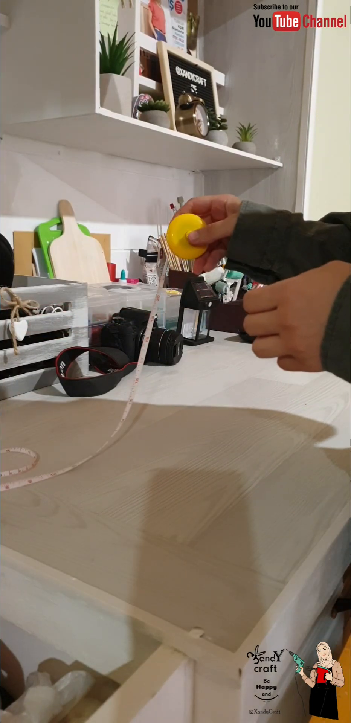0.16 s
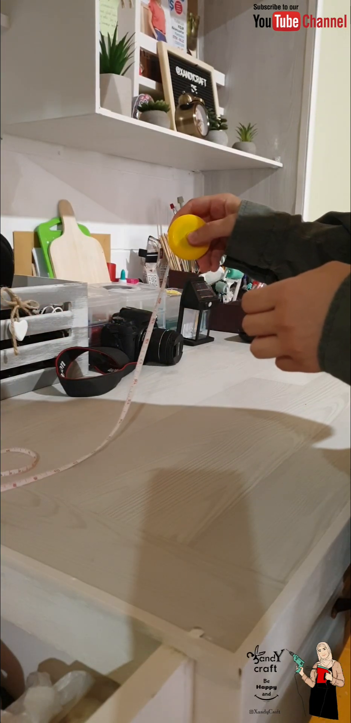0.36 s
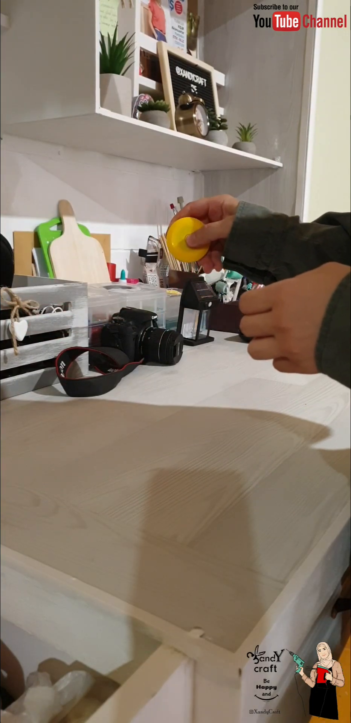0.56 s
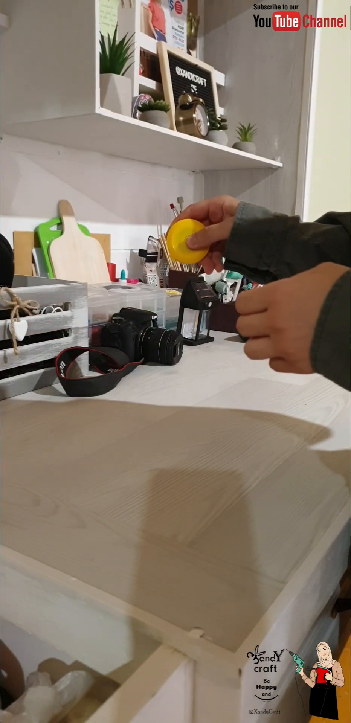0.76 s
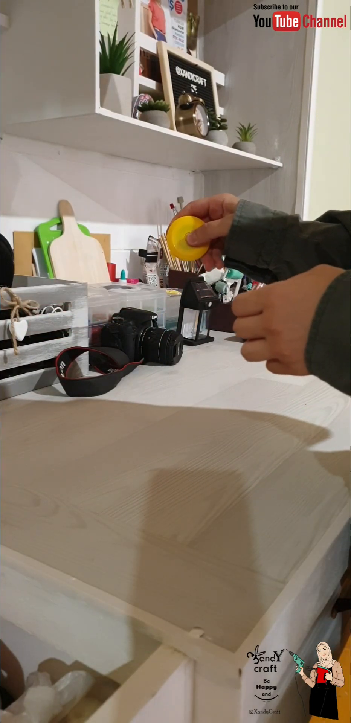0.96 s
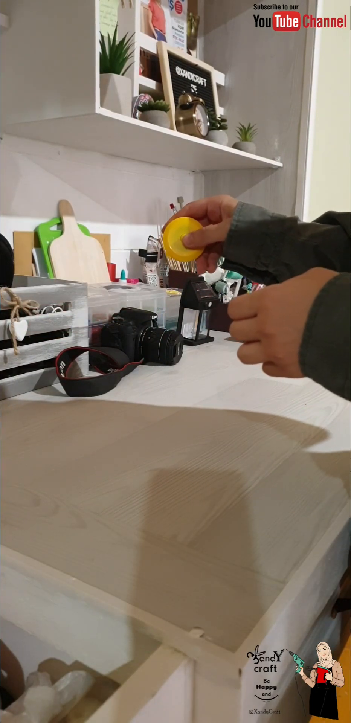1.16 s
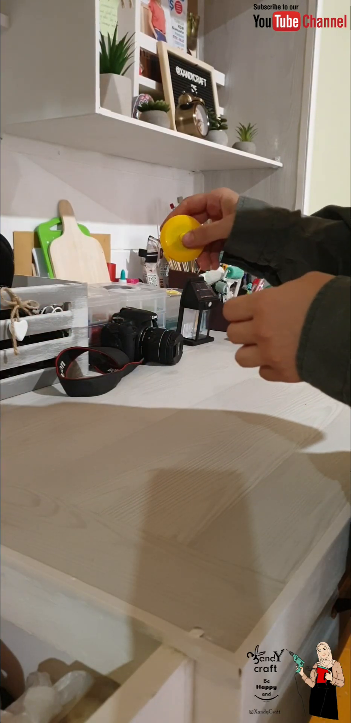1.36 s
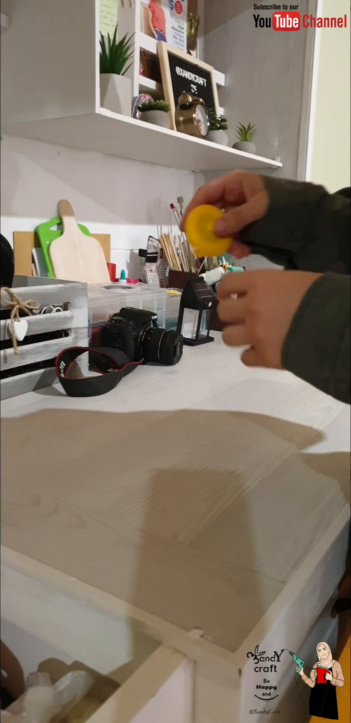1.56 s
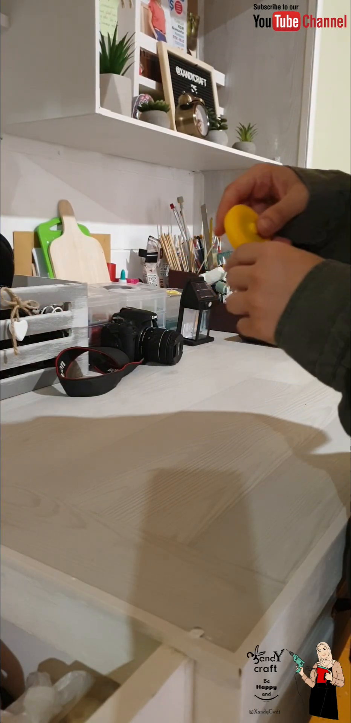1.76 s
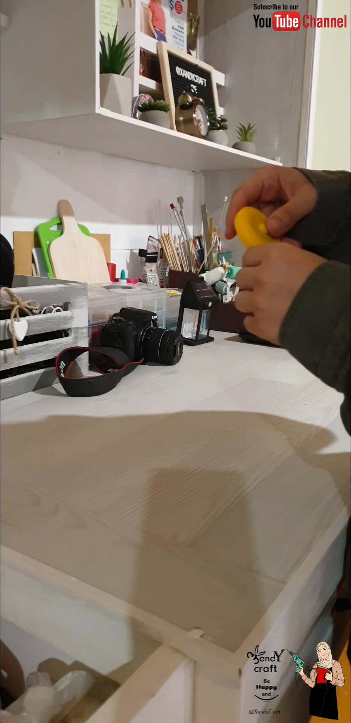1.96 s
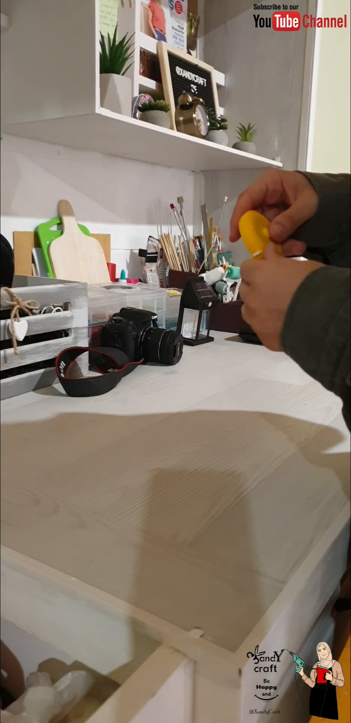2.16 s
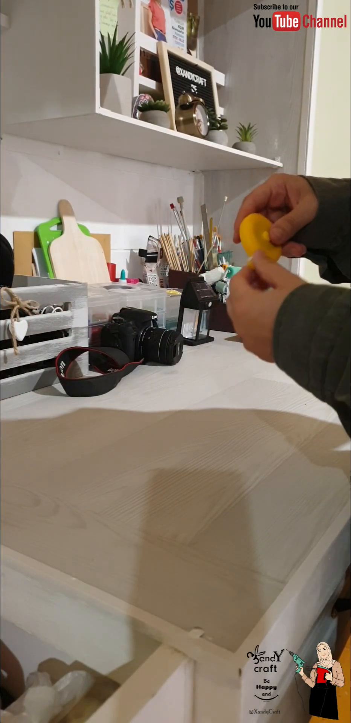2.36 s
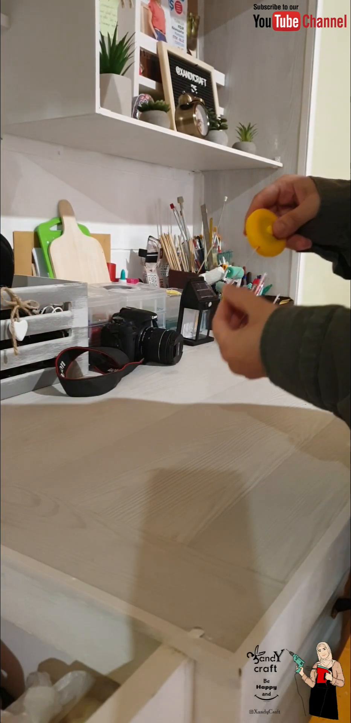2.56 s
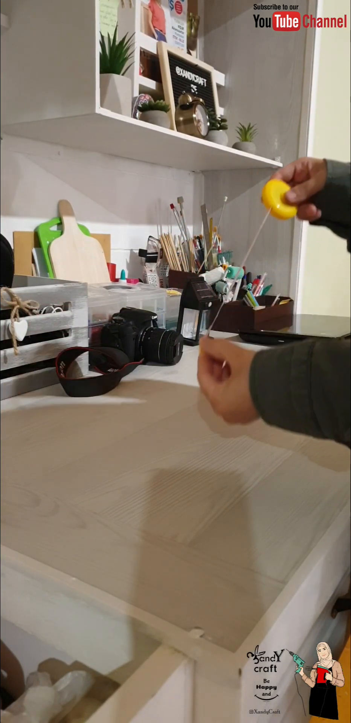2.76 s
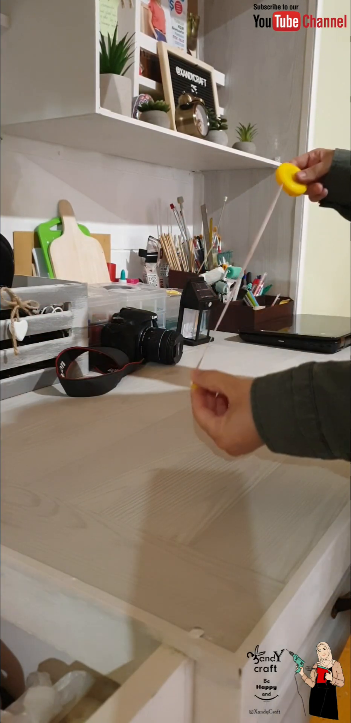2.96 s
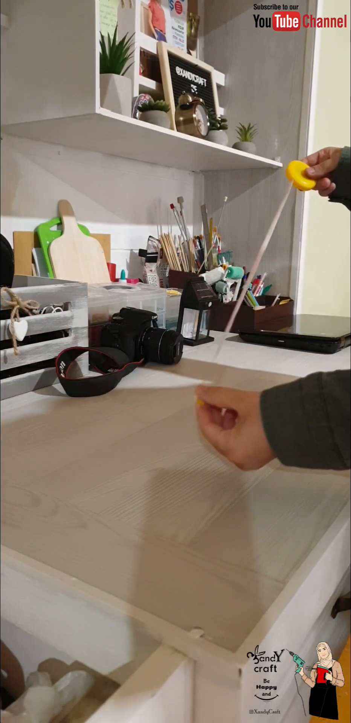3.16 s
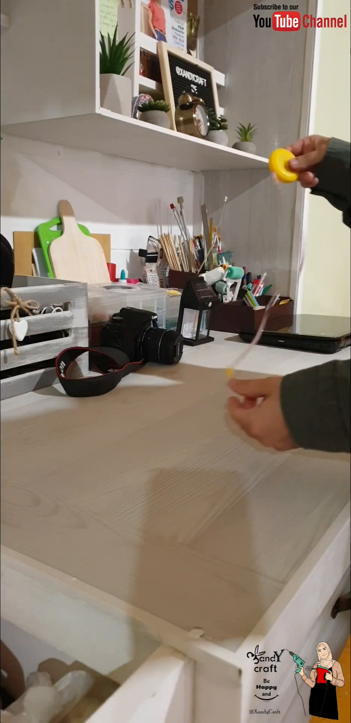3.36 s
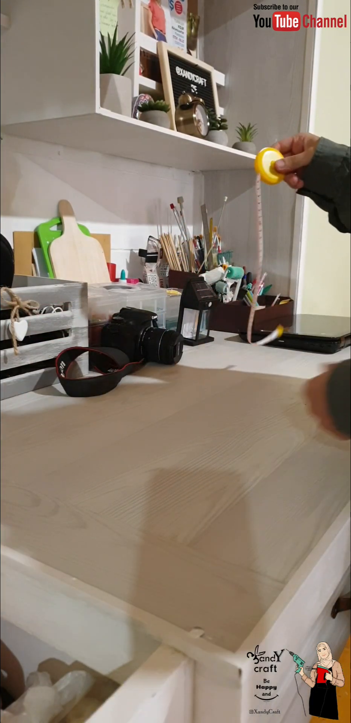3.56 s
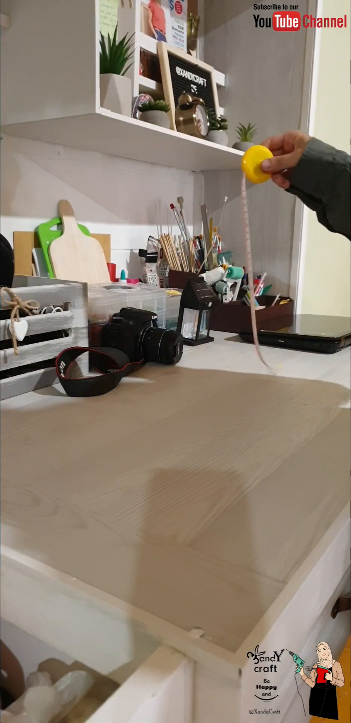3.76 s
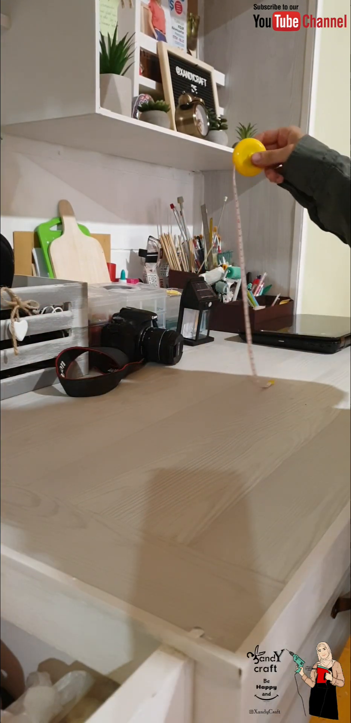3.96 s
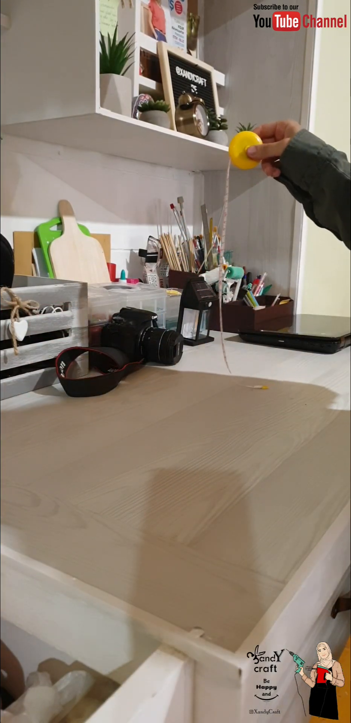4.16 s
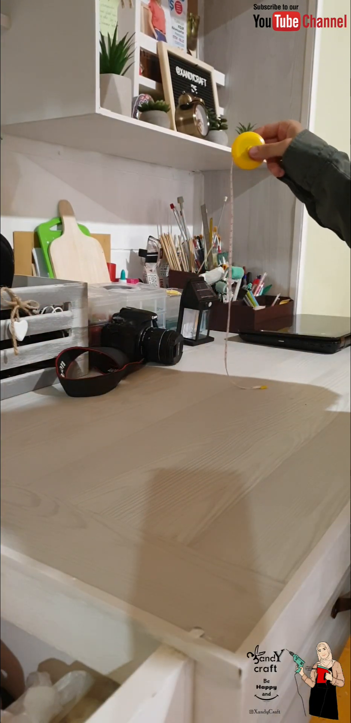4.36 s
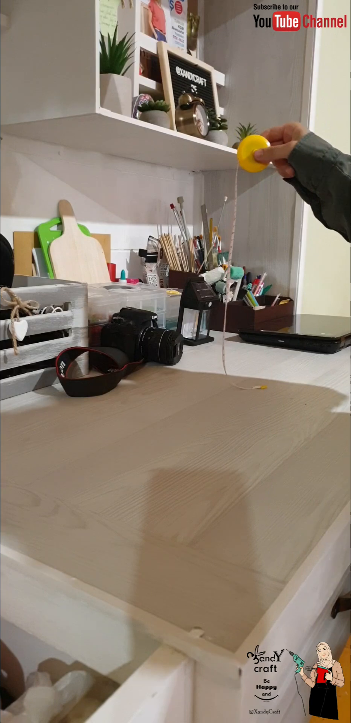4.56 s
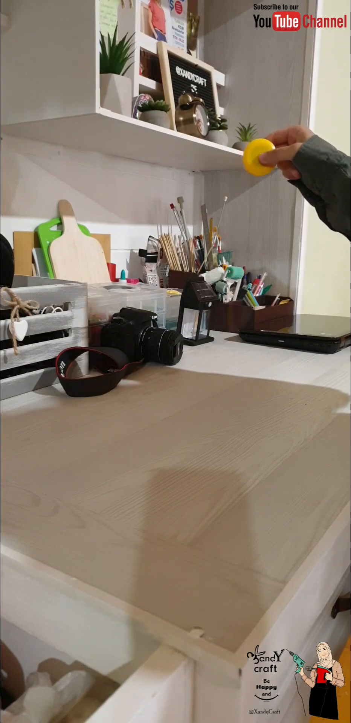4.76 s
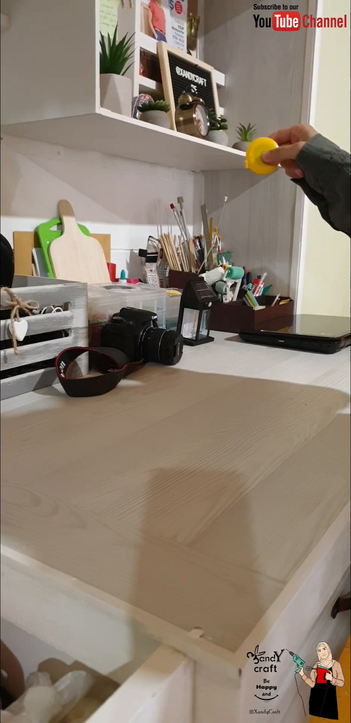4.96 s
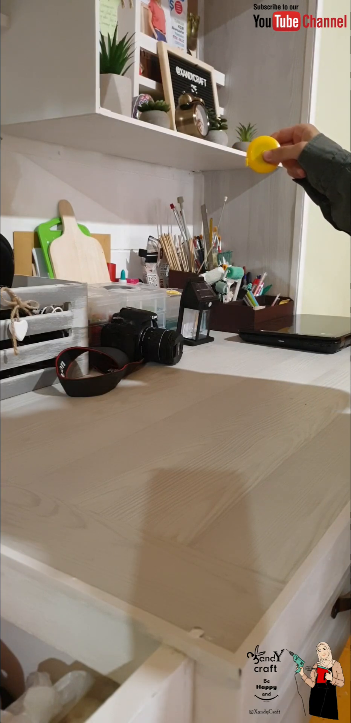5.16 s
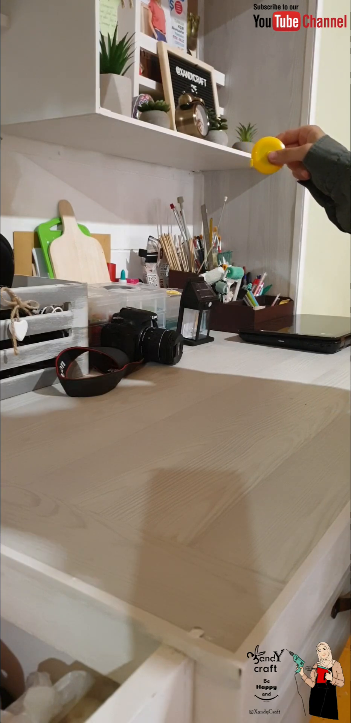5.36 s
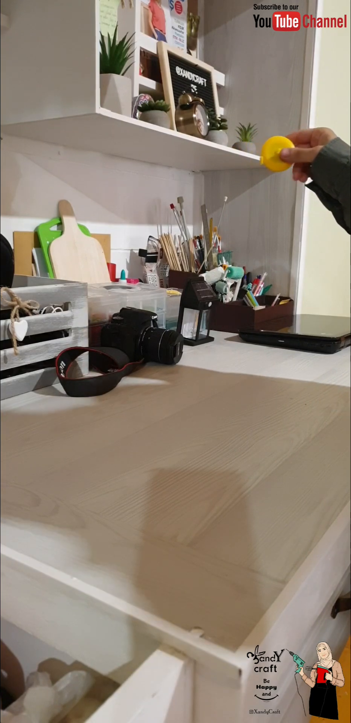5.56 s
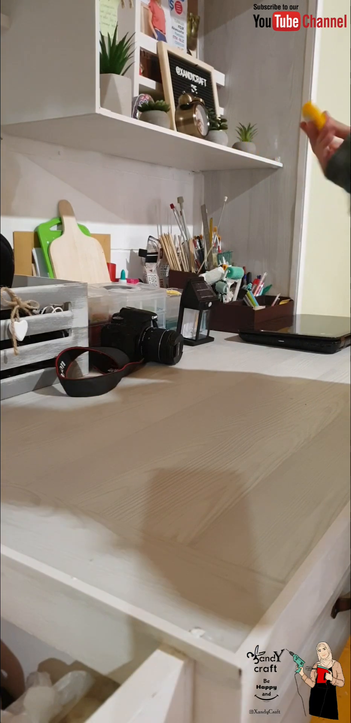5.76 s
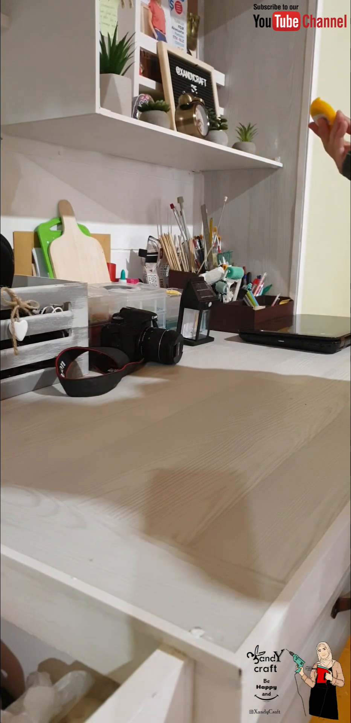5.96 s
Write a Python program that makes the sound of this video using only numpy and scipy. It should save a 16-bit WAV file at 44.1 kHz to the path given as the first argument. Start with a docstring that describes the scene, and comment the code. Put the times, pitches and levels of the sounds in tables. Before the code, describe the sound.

A small tape measure whirs in and snaps loudly, gets tugged out with rattles, taps the desk, then reels back to a second snap.

```python
"""A small, bright room: a small plastic tape measure is worked above a desk, a little right of a phone.
The spring reels the soft tape in with rattle and hiss, and its tip snaps against the case; the tape is drawn
out again in tugs, its tip drops on the desk, and it is reeled in to a second snap. Fingers squeak, low rubs and
fine hisses come and go, dull bumps shake the desk. Blows are noise bursts through resonant filters, rubbing is
dense tiny slips, bumps are low sines and filtered noise; all but booms and background noise excite the room."""
import sys
import numpy as np
from scipy import signal
from scipy.fft import rfft, irfft, next_fast_len
from scipy.io import wavfile
from scipy.ndimage import uniform_filter1d

SR = 44100
rng = np.random.default_rng(int(sys.argv[2]) if len(sys.argv) > 2 else 0)


def transcribe(u):
    """Save the signal u as a 16-bit wav file named by the first command-line argument.

    u: samples, shape (n,) or (channels, n), limited to [-1, 1]; the rate is SR.
    q: integer samples, one column per channel.
    """
    v = np.clip(np.atleast_2d(u).T, -1, 1)
    q = np.round(v * 32767).astype(np.int16)
    wavfile.write(sys.argv[1], SR, q)


N = 265041

# Spectrum of fine hiss. Each row: frequency in Hz, relative level in dB.
HISS_TONE = [(1500, -13.5), (2900, -1), (3500, -12), (4600, -5), (7000, -2.5), (9000, -6), (12000, -3),
             (16000, -13.5)]
ROOM_BUILD_S = 0.0018  # time the diffuse room sound takes to build up


def undb(db):
    """Decibels to gain."""
    return 10 ** (np.asarray(db) / 20)


def unit(x):
    """Scale to rms 1."""
    return x / np.sqrt(np.mean(x ** 2))


def read(points, hz):
    """Interpolate a table's value on a log-frequency axis."""
    f, value = np.transpose(points)
    return np.interp(np.log(hz + 1), np.log(f), value)


def add(track, s, sound):
    """Mix a sound in at time s (seconds)."""
    start = max(int(s * SR), 0)
    track[..., start:start + sound.shape[-1]] += sound[..., :N - start]


def response(points, tilt_db=0, ring_hz=1000, ring_db=0):
    """Minimum-phase impulse response: a spectrum, its tilt in dB per octave and one raised resonance."""
    size = 2048
    hz = np.fft.rfftfreq(size, 1 / SR)
    ring = ring_db / (1 + ((hz - ring_hz) / (0.068 * ring_hz)) ** 2)
    tilt = tilt_db * np.log2(np.maximum(hz, 500) / 500)
    low_cut = (hz + 1) / (hz + points[0][0] / 2)
    gain = undb(read(points, hz) + tilt + ring) * low_cut
    # folding the cepstrum onto positive times makes the response causal
    cepstrum = irfft(np.log(unit(gain)))
    cepstrum[1:size // 2] *= 2
    cepstrum[size // 2 + 1:] = 0
    return irfft(np.exp(rfft(cepstrum)))


def colour(x, points, tilt_db=0):
    """Filter a sound with a spectrum."""
    return signal.oaconvolve(x, response(points, tilt_db))[:len(x)]


def resonate(x, hz, width):
    """One resonance, gain 1 at its centre."""
    return signal.lfilter(*signal.iirpeak(hz, hz / width, fs=SR), x)


def swell(t, rise_s):
    """Rounded rise to 1 and a longer fall."""
    rise_s = max(rise_s, 1 / SR)
    return (t / rise_s * np.exp(1 - t / rise_s)) ** 2


def walk(rate):
    """Random levels held 1 / rate s and slewed; spread near 1."""
    hold = int(SR / rate)
    steps = rng.standard_normal(N)[np.arange(N) // hold]
    return uniform_filter1d(steps, hold)


def friction(rate):
    """Dense tiny slips (rate per second) of uneven size that come in patches."""
    slip_db, patch_db = 2.5, 3.5  # spreads of slip size and of patch level
    slips = (rng.random(N) < rate / SR) * rng.standard_normal(N)
    size_db = slip_db * np.minimum(rng.exponential(size=N), 4)
    return unit(slips * undb(size_db + patch_db * walk(120)))


def strokes(table):
    """Gain of rubbing strokes: each rises and falls as half a sine."""
    gain = np.zeros(N)
    for s, length_s, db in table:
        arch = np.sin(np.linspace(0, np.pi, int(length_s * SR)))
        add(gain, s, undb(db) * arch)
    return gain


def tail(build_s):
    """Diffuse room response of unit energy at each port, drawn anew at each call; treble and bass fade apart."""
    # Decay of the room. Each row: frequency in Hz, time to fall by 60 dB in seconds.
    room_t60 = [(200, .5), (1000, 0.33), (3000, 0.3667), (7000, 0.35), (11000, 0.3622), (16000, 0.2667)]
    size = 2 ** 15
    hz, age, cells = signal.stft(rng.standard_normal((2, size)), SR, nperseg=256)
    decay = np.exp(-np.log(1000) * age / read(room_t60, hz)[:, None])
    fading = signal.istft(cells * decay, SR)[1][:, :size]
    fading *= 1 - np.exp(-np.arange(size) / SR / build_s)
    return fading / np.linalg.norm(fading, axis=1, keepdims=True)


def background():
    """Faint background noise, partly shared by the two ports; after the loud snap its level dips once."""
    # Spectrum of the background. Each row: frequency in Hz, relative level in dB.
    background_tone = [(15, -40.5), (25, -6.5), (64, 0.5), (175, -18), (363, -19), (818, -22), (1610, -22),
                       (3430, -29.5), (5880, -30.5), (7110, -23), (10400, -30), (14800, -29.5),
                       (16000, -27)]
    background_db = -70.5  # rms before the dip
    dip_s, dip_fall_s, dip_db = 0.8, 0.39, -8.5  # start, time to the deepest point, depth
    shared = rng.standard_normal(N)
    noise = np.array([unit(colour(rng.standard_normal(N) + 1.2 * shared, background_tone)) for _ in range(2)])
    dip = swell(np.maximum(np.arange(N) / SR - dip_s, 0), dip_fall_s)
    return undb(background_db + dip_db * dip) * noise


def bumps(sag):
    """A soft push on the desk swells into a low boom that sags in pitch and swings again, with a woody thud."""
    # Each row: start in seconds, boom peak in dB, settled boom pitch in Hz, boom rise in seconds,
    # relative thud level in dB.
    pushes = [(0, -40.5, 43.8, .03, -51), (.254, -34.5, 46.17, .062, -43), (.759, -33, 46.1, .04, -42.5),
              (1.277, -45, 58, 0.055, -42.5), (1.29, -48.5, 171, .025, -49), (1.6, -65, 65.2, 0.14, -60),
              (1.936, -30.5, 62.7, 0.042, -40.5), (2.316, -40.5, 52.1, 0.047, -52),
              (2.675, -47.5, 51.6, 0.06, -50), (3.51, -58, 56.7, 0.05, -66.5),
              (4.02, -48, 57.7, 0.1, -55.5), (4.039, -53.5, 136, .04, -54),
              (4.702, -49.5, 48, 0.044, -61.5), (4.859, -53, 67, 0.051, -57), (5.32, -57, 43.2, 0.043, -67)]
    # Spectrum of the thud. Each row: frequency in Hz, relative level in dB.
    thud_tone = [(40, -3.5), (70, 9.5), (98, 11), (135, -2), (165, -13.5), (210, -4), (265, -13),
                 (420, -17.5), (700, -28), (1500, -42.5), (5000, -54)]
    # the weaker after-swing of the desk, its level relative to the boom
    swing_delay_s, swing_rise_s, swing_hz, swing_db = 0.14, 0.072, 47, -16
    boom, thud = np.zeros(N), np.zeros(N)
    t = np.arange(SR) / SR
    for s, boom_db, hz, rise_s, thud_db in pushes:
        cycles = np.cumsum(hz * (1 + sag * np.exp(-t / rise_s))) / SR
        add(boom, s, undb(boom_db) * swell(t, rise_s) * np.sin(2 * np.pi * cycles))
        after_swing = swell(t, swing_rise_s) * np.sin(2 * np.pi * swing_hz * t)
        add(boom, s + swing_delay_s, undb(boom_db + swing_db) * after_swing)
        wood = colour(rng.standard_normal(len(t)), thud_tone)
        add(thud, s, undb(thud_db) * swell(t, 0.84 * rise_s) * wood)
    return boom, thud


def low_rubs():
    """Soft low rubs of cloth, and the low body of the reel and snaps: sparse slips through a dark spectrum."""
    # Each row: start in seconds, length in seconds, relative level in dB.
    rubs = [(0, 0.017, -54.5), (.16, 0.28, -64.5), (.52, 0.11, -57.5), (.75, 0.14, -58), (1.18, 0.35, -63),
            (1.37, 0.48, -55.5), (1.61, 0.069, -54.5), (2.23, 0.24, -65), (2.49, 0.19, -57.5),
            (2.55, 0.51, -64.5), (3.17, 0.14, -74), (3.46, 0.15, -53), (3.89, 0.2, -57),
            (4.81, 0.087, -57.5), (5.3, 0.19, -71.5), (5.94, 0.1, -67)]
    # Spectrum of the low rubs. Each row: frequency in Hz, relative level in dB.
    rub_tone = [(100, -3), (250, -6.5), (370, 1.5), (500, 3.5), (750, -5.5), (1500, -11), (3500, -25.5),
                (7000, -24.5), (16000, -31.5)]
    return undb(-4.0) * colour(friction(rate=500), rub_tone) * strokes(rubs)


def fine_hisses():
    """Fine bright hisses of very dense slips: brushing tape or fingers, sleeve rustle, some of unknown source."""
    # Each row: start in seconds, length in seconds, relative level in dB.
    brushes = [(.22, 0.11, -60.5), (1.28, 0.077, -71), (1.48, 0.2, -54.5), (1.6, 0.24, -58.5),
               (1.93, 0.046, -56.5), (2.27, 0.29, -64), (3.66, 0.62, -52.5), (3.92, 0.17, -70),
               (4.21, 0.31, -54.5), (5.18, 0.18, -60), (5.775, 0.068, -48)]
    hiss = colour(friction(rate=14000), HISS_TONE)
    return undb(-9) * hiss * strokes(brushes)


def fingers(width_share):
    """Skin slips on the plastic case and stirs a pair of resonances into a faint squeak each time."""
    # Each row: start in seconds, lower resonance in Hz, its relative level in dB,
    # upper resonance's relative level in dB, rise in seconds.
    squeaks = [(1.43, 1825, -66.5, -52.5, 0.0094), (2.08, 2020, -66.5, -69.5, 0.02),
               (2.141, 3046, -59.5, -67, 0.012), (2.32, 2800, -72, -84, 0.023),
               (2.51, 2800, -62.5, -84, 0.0091), (4.222, 1940, -56.5, -56, 0.017),
               (4.65, 2420, -67.5, -76, 0.01), (5.094, 2000, -68, -66.5, 0.01),
               (5.285, 1820, -75, -90, 0.051), (5.372, 1730, -60, -84.5, 0.032),
               (5.79, 1887, -66.5, -62.5, 0.024)]
    squeak_ratio = 2.15  # upper resonance over lower
    out, t = np.zeros(N), np.arange(SR // 2) / SR
    for s, lower_hz, lower_db, upper_db, rise_s in squeaks:
        for hz, db in (lower_hz, lower_db), (squeak_ratio * lower_hz, upper_db):
            width = width_share * hz
            ring = resonate(resonate(rng.standard_normal(len(t)), hz, width), hz, width)
            add(out, s, undb(db) * unit(ring) * np.sqrt(swell(t, rise_s)))
    return out


def spool():
    """Gains of rattle and hiss: the spring spins the spool up, louder until the tape is home; tugs turn it too."""
    # The hand draws the tape out. Each row: start in seconds, length in seconds, relative rattle level in dB.
    tugs = [(2.47, 0.09, -60.5), (2.6, 0.21, -58.5), (2.79, 0.19, -58), (2.92, 0.22, -57.5),
            (3.15, 0.16, -55)]
    # The spring winds the tape in. Each row: release in seconds, tip home in seconds,
    # relative rattle level in dB, relative hiss level in dB, both as the tip arrives.
    rewinds = [(0.448, 0.554, -46, -36), (4.737, 4.866, -39, -34)]
    spin_up_s, climb_db_per_s, stop_s = 0.061, 63, 0.0032
    rattle_power, hiss_power = 0.28, 0.92  # powers of the spool's speed
    t = np.arange(N) / SR
    rattle = strokes(tugs)
    hiss = undb(-3.5) * rattle
    for release_s, home_s, rattle_db, hiss_db in rewinds:
        speed = np.tanh(np.maximum(t - release_s, 0) / spin_up_s)
        climb = undb(-climb_db_per_s * np.maximum(home_s - t, 0))
        approach = climb * np.exp(-np.maximum(t - home_s, 0) / stop_s)
        rattle = rattle + undb(rattle_db) * speed ** rattle_power * approach
        hiss = hiss + undb(hiss_db) * speed ** hiss_power * approach
    return rattle, hiss


def reel():
    """The spool rattles the hollow case while the tape hisses through its slot."""
    # Resonances of the case. Each row: frequency in Hz, width in Hz, relative level in dB.
    case = [(960, 50, 0), (1144, 140, 8.5), (1360, 300, -2), (1550, 1000, -10.5), (2720, 170, -9.5),
            (3700, 130, -20.5)]
    rattle = friction(rate=760)
    body = np.zeros(N)
    for hz, width, db in case:
        # each panel of the case is also struck by slips of its own
        panel_slips = 0.38 * rattle + friction(rate=380)
        body += undb(db) * resonate(panel_slips, hz, width)
    band = signal.butter(2, (700, 5000), "band", fs=SR, output="sos")
    body = unit(signal.sosfilt(band, body))
    hiss = unit(colour(friction(rate=5000) + 0.6 * rattle, HISS_TONE))
    rattle_gain, hiss_gain = spool()
    return body * rattle_gain + hiss * hiss_gain


def strikes(table, tone, chatter, direct_db, soften_db):
    """Each blow is one hard contact, strongest in short blows, and a chatter of loose parts; direct and room sound."""
    direct, diffuse = np.zeros((2, N)), np.zeros((2, N))
    t = np.arange(4096) / SR
    for s, db, tilt_db, chatter_ms, ring_hz, ring_db in table:
        chatter_s = max(chatter_ms, .2) / 1000
        force = rng.standard_normal(len(t)) * np.exp(-t / chatter_s) * (1 - np.exp(-2 * t / chatter_s))
        force *= chatter / np.linalg.norm(force)
        force[0] = np.exp(-chatter_ms / 2)  # the hard contact
        body = response(tone, tilt_db, ring_hz, ring_db)
        blow = signal.fftconvolve(force, body)
        # each doubling of the chatter beyond 2 ms softens the direct sound
        attack_db = direct_db + soften_db * np.log2(max(chatter_ms / 2, 1))
        add(direct, s, undb(db + attack_db) * blow / np.linalg.norm(blow))
        # a longer chatter fills the room more slowly
        room = tail(ROOM_BUILD_S + chatter_s)
        add(diffuse, s, undb(db) * signal.fftconvolve(room, body[None]))
    return direct, diffuse


def clicks():
    """Button, ratchet and spool knock inside the case."""
    # Each row: start in seconds, relative level in dB, tilt in dB per octave, chatter in ms,
    # ring in Hz, ring height in dB.
    knocks = [(.2105, -40.5, 1, 1.6, 4240, -0.5), (.4955, -9.5, 0, 3, 1760, 14.5),
              (.6255, -9, 1, 1.2, 3070, -9), (1.4345, -19.5, 2.5, 5.8, 4100, 4),
              (2.076, -27.5, -1.5, 15.4, 3210, 3), (2.805, -19, -2.5, 5.1, 1147, 19),
              (2.823, -15, -.5, 1.8, 2730, 3.5), (2.883, -31, -4, 1.4, 1240, 14),
              (2.9605, -24.5, -4.5, 5.6, 2750, 9), (3.178, -19, -1.5, 7.4, 2870, 8),
              (3.2484, -15.5, -1, 1.6, 3940, 5.5), (4.7455, -20.5, -1, 5.4, 1008, 9.5),
              (4.7774, -14, -2.5, 1.3, 2630, 9.5), (4.8095, -16, 1, 1.7, 3570, 20),
              (4.855, -13, -7.5, 1.26, 1340, 11), (5.431, -22.5, -1, 11, 985, 9.5),
              (5.595, -40, -2.5, 9.4, 2300, 7), (5.789, -25.5, 0, 43, 3020, 10.5)]
    # Spectrum of a knock. Each row: frequency in Hz, relative level in dB.
    click_tone = [(250, -24.5), (580, -25), (850, -0.5), (1150, -3), (1600, -2.5), (2100, -8.5),
                  (2850, 0.5), (3400, -7), (3850, 0), (4600, -3.5), (7200, -1.5), (9500, -4.5),
                  (16000, -5.5)]
    return strikes(knocks, click_tone, chatter=4.2, direct_db=-1.5, soften_db=-4.0)


def drops():
    """The tip lands on the desk and the tape slaps after it."""
    # Each row: start in seconds, relative level in dB, tilt in dB per octave, chatter in ms,
    # ring in Hz, ring height in dB.
    landings = [(3.4511, -9.5, 6.4, 1.6, 2360, 5.5), (3.461, -7.5, 8.9, 2.3, 6860, 5.6),
                (3.474, -11.5, 5.4, 16.4, 5240, 6.8), (3.8126, -20, 3.8, 1.6, 1600, 9.5),
                (3.8157, -15, 8.5, 2.3, 3520, 5.6), (3.824, -14, 21, 0.93, 14500, 6.6),
                (4.2255, -17.5, 5.7, 3.6, 4270, 3.9), (4.241, -27.5, 1.3, 2, 1056, 9)]
    # Spectrum of a landing. Each row: frequency in Hz, relative level in dB.
    drop_tone = [(200, -35), (550, 3.5), (900, 0.5), (1250, 8.5), (2000, 6.5), (2800, 3), (4200, -2.5),
                 (6600, -6.5), (10000, -13.5), (16000, -19)]
    return strikes(landings, drop_tone, chatter=1.6, direct_db=-2, soften_db=-13)


def snaps():
    """The tip slams into the case and rebounds."""
    # Each row: start in seconds, relative level in dB, tilt in dB per octave, chatter in ms,
    # ring in Hz, ring height in dB.
    slams = [(.5607, 8.5, 11, .6, 14400, 3.5), (.5642, -2.5, 0, .7, 11200, 1.5),
             (.5692, -2, -1, 2.5, 12250, -3.5), (.5945, -5.5, -2, 1, 12900, 7),
             (4.8442, -9.5, -3.5, 3.7, 7640, 7), (4.8563, 0.5, 0, 3, 5870, 10),
             (4.863, -27.5, -14.5, 1.7, 7440, 20.5), (4.891, -8.5, -2.5, .5, 6860, 11.5)]
    # Spectrum of a slam. Each row: frequency in Hz, relative level in dB.
    snap_tone = [(300, -38), (900, -28), (2400, -21), (3800, -14.5), (4700, -14.5), (5600, -11), (7300, 1),
                 (8800, -4.5), (10800, -1.5), (12500, 0), (16000, -8)]
    return strikes(slams, snap_tone, chatter=1, direct_db=.5, soften_db=0)


def ports(direct, diffuse):
    """Direct sound reaches the right port slightly later, with early echoes; most of the spectrum leans right."""
    # Early echoes from desk, shelf and wall. Each row: delay left in ms, delay right in ms, level in dB
    # relative to the direct sound.
    echoes = [(.8, 1.1, -11), (3.3, 3.1, -4), (9.9, 10.1, -4.5)]
    # Stereo balance. Each row: frequency in Hz, left minus right in dB.
    balance_db = [(100, 1), (380, -5), (1200, -4.5), (2500, -9.5), (4500, -6.5), (8000, -9), (15000, 2.5)]
    size = next_fast_len(N + SR // 10, True)
    hz, out = np.fft.rfftfreq(size, 1 / SR), []
    for ear, side in enumerate((1, -1)):
        early = np.zeros(size)
        early[8 * ear] = 1  # the right port lies 8 samples further back
        for *delays_ms, db in echoes:
            early[int(delays_ms[ear] * SR / 1000)] += undb(db)
        heard = rfft(direct[ear], size) * rfft(early) + rfft(diffuse[ear], size)
        balance = undb(side * read(balance_db, hz) / 2)
        out.append(irfft(heard * balance, size)[:N])
    return np.array(out)


def scene():
    """Blows, rubbing and thuds sound into the room; the bumps also reach the phone through the desk."""
    boom, thud = bumps(sag=.3)
    rubbing = low_rubs() + fine_hisses() + fingers(width_share=0.22) + reel()
    direct, diffuse = np.sum([clicks(), drops(), snaps()], axis=0)
    into_room = rubbing + undb(-9.5) * thud
    wash = signal.fftconvolve(into_room[None], tail(ROOM_BUILD_S))[:, :N]
    airborne = ports(direct + undb(-8.5) * rubbing, diffuse + undb(-2.5) * wash)
    through_desk = boom + undb(-0.5) * thud  # the same at both ports
    return airborne + through_desk + background()


def record(dry):
    """The phone cuts the top above 16.1 kHz with a steep low-pass."""
    return signal.sosfilt(signal.ellip(10, .2, 80, 16100, fs=SR, output="sos"), dry)


dry = scene()
out = record(dry)
transcribe(out)
```